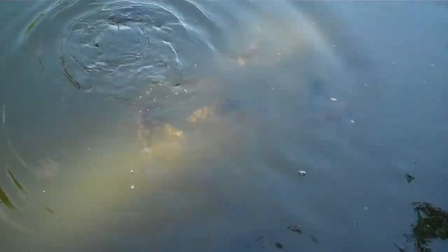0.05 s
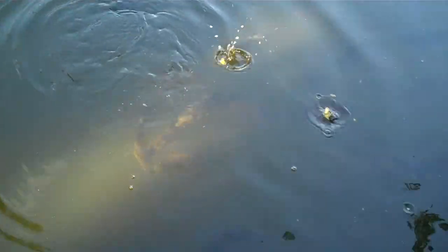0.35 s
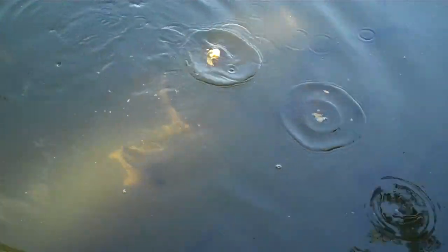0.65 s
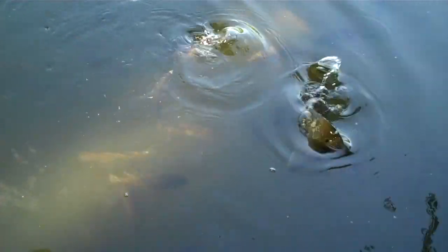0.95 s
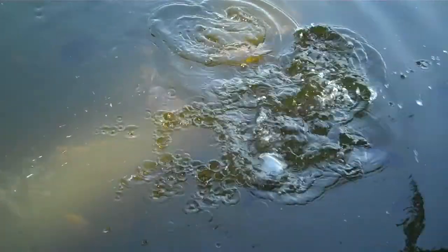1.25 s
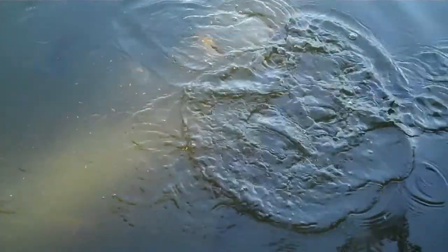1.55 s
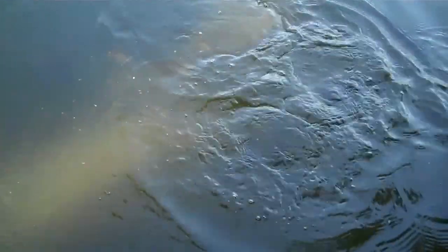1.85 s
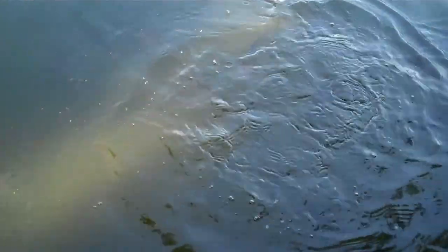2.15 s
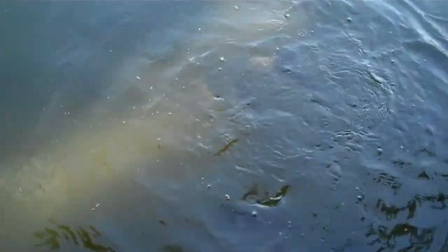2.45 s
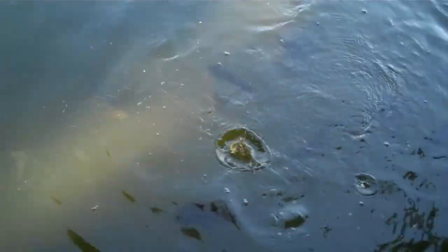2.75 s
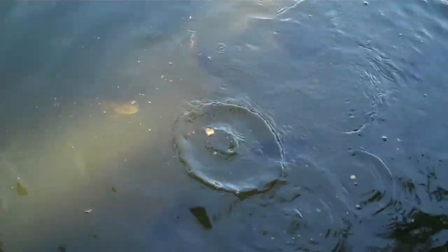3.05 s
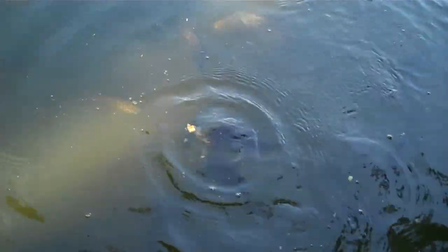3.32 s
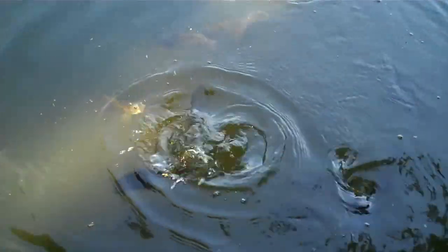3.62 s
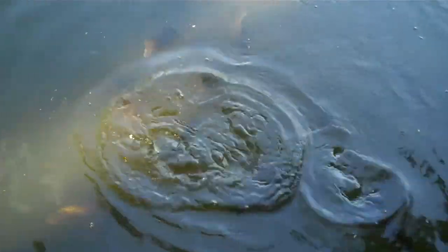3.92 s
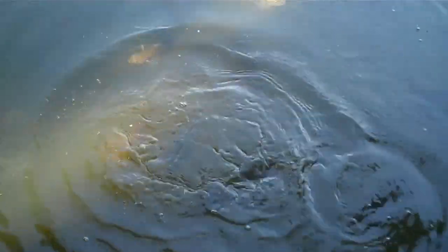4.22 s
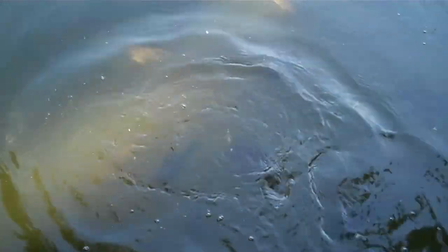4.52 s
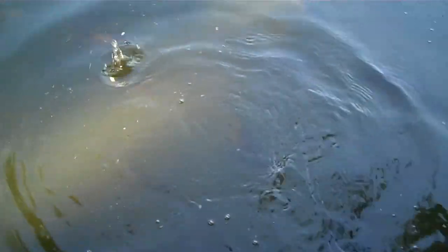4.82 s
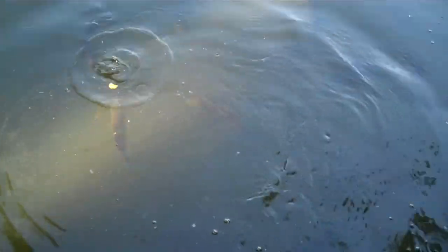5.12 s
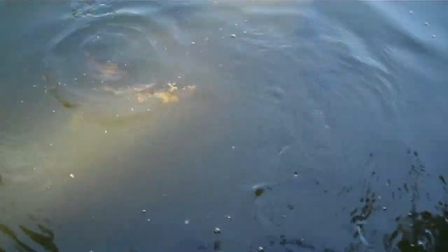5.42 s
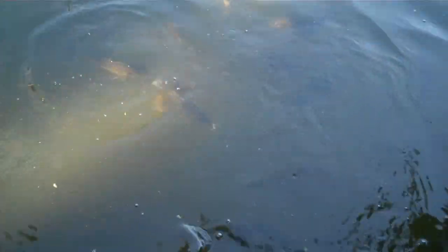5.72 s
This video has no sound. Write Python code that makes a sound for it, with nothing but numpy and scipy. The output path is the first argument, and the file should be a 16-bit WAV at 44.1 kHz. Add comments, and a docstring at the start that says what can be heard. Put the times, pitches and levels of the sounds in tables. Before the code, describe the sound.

On a quiet pond, fish mouths snap at the surface and one fish thrashes, throwing spray that patters back. The water settles, then a sharp snap and two bubbling gulps come with more droplets. Near the end there are small drips, a few bird whistles and a faint high rustle. The water sounds close and bright through a small microphone, with thin bird calls and an engine idling far away throughout.

```python
"""Sharp snaps, splashes and plops on a pond, with small birds calling and an engine idling far away.
Fish are taking floating food: mouths snap at the surface, one fish thrashes, another rolls under with
two gulps. Air trapped in the water rings as bubbles, most of them rising in pitch, and spray patters
back. A small camera hears it all through two microphone ports (little openings) that ring in the treble."""
import sys
import numpy as np
from scipy import signal
from scipy.fft import rfft, irfft
from scipy.io import wavfile

SR = 44100
rng = np.random.default_rng(int(sys.argv[2]) if len(sys.argv) > 2 else 0)


def inscribe(sig):
    """Save sig as 16-bit PCM at rate SR to the path in sys.argv[1].

    A 1-D sig is mono; a 2-D sig holds one channel per row.
    Samples are clipped to [-1, 1] before scaling.
    """
    pcm = np.round(np.clip(np.atleast_2d(sig).T, -1, 1) * 32767)
    wavfile.write(sys.argv[1], SR, pcm.astype(np.int16))


N = 258867
TIME = np.arange(N) / SR

# tone colour of tearing water, for snaps and foam: (frequency [Hz], level [dB])
TEAR_COLOUR = [(200, -36), (700, 11), (1500, 16), (3500, 12), (5000, -4.5), (8000, -6), (14000, -2)]


def amp(db):
    """Turns decibels into a number to multiply by."""
    return 10 ** (np.asarray(db) / 20)


def unit(x):
    """Scales a signal to an average (rms) size of 1."""
    return x / np.sqrt(np.mean(x ** 2) + 1e-20)


def spectrum(points, hz):
    """Reads the gain at each frequency from a curve through (Hz, dB) points."""
    f, db = np.transpose(points)
    return amp(np.interp(np.log(hz + 1), np.log(f + 1), db))


def colour(x, points):
    """Makes some frequencies louder and others softer, following (Hz, dB) points."""
    return irfft(rfft(x) * spectrum(points, np.fft.rfftfreq(x.shape[-1], 1 / SR)), x.shape[-1])


def noise(points):
    """Steady noise shaped by (Hz, dB per Hz) points."""
    return colour(rng.standard_normal(N), points) * np.sqrt(SR / 2)


def drift(hz):
    """A smooth random wander of size 1; a higher hz makes it quicker."""
    smoothing = np.exp(-(np.fft.rfftfreq(N, 1 / SR) / hz) ** 2)
    return unit(irfft(rfft(rng.standard_normal(N)) * smoothing, N))


def add(mix, s, sound):
    """Mixes a sound in at s seconds."""
    part = mix[max(round(s * SR), 0):][:len(sound)]
    part += sound[:len(part)]


def surges(rows, attack_s, fall_db_per_s):
    """The joint loudness of (time, length, dB) surges that each rise, hold and die away."""
    power = np.zeros(N)
    for s, length, db in rows:
        rise = np.clip((TIME - s) / attack_s, 0, 1)
        power += (rise * amp(db - fall_db_per_s * np.maximum(TIME - s - length, 0))) ** 2
    return np.sqrt(power)


def echoes(x, fade_s, delay_s):
    """A cloud of reflections, different for each ear, that falls 60 dB in fade_s."""
    t = np.arange(SR // 2) / SR
    tail = rng.standard_normal((2, len(t))) * amp(-60 * t / fade_s) * (t > delay_s)
    return signal.fftconvolve(x[None], tail / np.linalg.norm(tail[0]), axes=1)[:, :N]


def ping(hz, cycles, swell):
    """A small bubble: a tone that swells as the bubble pinches off, then dies while its pitch creeps up."""
    age = np.arange(int(6 * cycles * SR / hz) + 2) * hz / SR / cycles
    tone = np.sin(2 * np.pi * cycles * age * (1 + 0.0047 * age))
    return tone * np.exp(-age) * (1 - np.exp(-(age / swell) ** 2))


def swarm(per_s, low_hz, high_hz, cycles, spread_db):
    """Countless small pings of many pitches and sizes, born at random moments."""
    out, pitches = np.zeros(N), 32
    for hz in np.geomspace(low_hz, min(high_hz, SR / 2), pitches):
        when, chance = rng.random((2, 1500))
        used = np.arange(len(when)) < per_s * N / SR / pitches
        births = np.zeros(N)
        births[(when * N).astype(int)[used]] = amp(-spread_db * np.log(chance[used] + 0.016))
        out += signal.oaconvolve(births, ping(hz, cycles, swell=0.084))[:N] * np.sqrt(hz)
    return unit(out)


def air(apart_hz=5500):
    """A soft outdoor wash: much alike in both ears in the bass, unrelated in the treble."""
    # the wash: (frequency [Hz], level [dB per Hz])
    wash = [(30, -103), (100, -79), (600, -91.5), (1100, -93), (2000, -100), (3500, -102.5), (5500, -101.5),
            (7500, -107), (10000, -115), (15000, -146)]
    angle = np.pi / 4 * np.minimum(np.fft.rfftfreq(N, 1 / SR) / apart_hz + 0.47, 1)
    mid = rfft(noise(wash)) * np.cos(angle)
    side = rfft(noise(wash)) * np.sin(angle)
    return irfft([mid + side, mid - side], N)


def engine(cycle_hz=15.4, waver_db=0.255, hum_db=-1, rumble_db=2, fade_db_per_s=0.91):
    """A distant engine hums and rumbles; its higher tones waver more and slowly fade with the rumble."""
    # tones of the hum: (multiple of the cycle rate, level [dB])
    tones = [(4, -54), (5, -48), (6, -70), (9, -54), (12, -55), (14, -52.5), (19, -54.5)]
    # the rumble: (frequency [Hz], level [dB per Hz])
    rumble = [(40, -102), (80, -75), (130, -79), (200, -71), (310, -66), (390, -86), (560, -78),
              (1000, -110)]
    # the whole engine gets quieter near the end: (time [s], level [dB])
    loudness = [(4.2, -8.5), (5.87, -13.5)]
    turns = cycle_hz * TIME + 0.012 * drift(2.5)  # slightly uneven speed
    fade_db = -fade_db_per_s * TIME
    hum = np.zeros(N)
    for multiple, db in tones:
        level = amp(db + hum_db + multiple * waver_db * drift(1.6) + fade_db * (multiple > 6))
        hum += np.sqrt(2) * level * np.sin(2 * np.pi * (multiple * turns + rng.random()))
    overall = amp(np.interp(TIME, *np.transpose(loudness)))
    return overall * (hum + amp(rumble_db + fade_db) * noise(rumble))


def birds(direct_db=-8.5, trees_db=-9.0, arch=0.0257, chirp_every_s=0.13):
    """Thin gliding notes that arch, quaver and flutter a little, blurred by the trees."""
    # one bird repeats a falling chirp in bouts: (time [s], length of the bout [s])
    bouts = [(0.406, .25), (1.691, .45), (3.136, .25), (5.344, .1), (5.793, .1)]
    # its chirp: (length [s], first pitch [Hz], last pitch [Hz], level [dB])
    chirp = (.05, 4900, 3100, -58.5)
    # a second bird gives high upward flicks: (time [s], level [dB])
    flick_calls = [(0.133, -40.5), (2.527, -42), (3.693, -37.5), (4.687, -41)]
    # its flick: (length [s], first pitch [Hz], last pitch [Hz])
    flick = (0.0104, 5730, 7950)
    # a farther bird answers with soft rising peeps: (time [s])
    peep_times = [2.414, 3.039, 3.28, 4.06]
    # its peep: (length [s], first pitch [Hz], last pitch [Hz], level [dB])
    peep = (0.1, 2197, 2596, -62)
    # other birds whistle: (time [s], length [s], first pitch [Hz], last pitch [Hz], level [dB])
    whistles = [(4.44, 0.033, 6880, 7270, -57), (5.122, 0.055, 2820, 3100, -51),
                (5.402, 0.029, 3950, 4470, -41.5), (5.478, 0.051, 2340, 2580, -45.5),
                (5.554, 0.048, 2700, 3045, -45.5), (5.618, 0.16, 2820, 2580, -57),
                (5.852, 0.029, 3770, 4220, -41)]
    chirps = [(s + after, *chirp) for s, length in bouts for after in np.arange(0, length, chirp_every_s)]
    flicks = [(s, *flick, db) for s, db in flick_calls]
    peeps = [(s, *peep) for s in peep_times]
    out, quaver = np.zeros(N), 1 + .02 * drift(200)
    for s, length, first, last, db in chirps + flicks + peeps + whistles:
        age = np.linspace(0, 1, int(length * SR))
        hz = (first + (last - first) * age) * (1 + arch * np.sin(np.pi * age))
        hz *= np.roll(quaver, -int(s * SR))[:len(hz)]
        tone = np.sin(2 * np.pi * np.cumsum(hz) / SR)
        add(out, s, amp(db) * signal.windows.tukey(len(hz), .6) * tone)
    out *= 1 + .45 * drift(120)  # flutter
    return amp(direct_db) * out + amp(trees_db) * echoes(out, fade_s=.6, delay_s=.012)


def rustle(start_s=4.95, rise_s=.12, db=-64, clump_db=3.0):
    """A soft, uneven, high rustle of tiny ticks comes in near the end."""
    ticks = swarm(800, 4200, 13000, cycles=2, spread_db=5.5) * amp(clump_db * drift(35))
    return amp(db) * np.clip((TIME - start_s) / rise_s, 0, 1) * ticks


def thrashing(spray_db=-4, bubbling_db=-4, foam_db=-11, patter_db=-3, slosh_db=-5, calm_db=-75):
    """Each tail stroke throws fine spray and folds in air; droplets patter on over a faint slosh."""
    # strokes of the tail: (time [s], length [s], spray level [dB], bubbling level [dB])
    strokes = [(1.025, 0.0061, -52, -36.5), (1.097, 0.03, -31.5, -50), (1.149, 0.014, -38, -39.5),
               (1.196, 0.022, -37, -38), (1.265, 0.018, -35, -43.5), (1.379, 0.004, -38.5, -51)]
    # a fish stirs the surface and droplets patter: (time [s], length [s], level [dB])
    stirs = [(.82, 0.6, -62.5), (3.638, 0.035, -52.5), (3.69, 0.11, -48), (3.88, 0.017, -44.5),
             (5.372, .01, -54.5), (5.785, 0.021, -50)]
    thrown = [(s, length, db) for s, length, db, _ in strokes]
    folded = [(s, length, db) for s, length, _, db in strokes]
    foam = amp(foam_db) * unit(noise(TEAR_COLOUR))
    gurgle = swarm(2000, 595, 3440, cycles=15, spread_db=5.6)
    clumps = amp(spray_db + 3 * drift(37))
    fizz = swarm(2400, 2570, 16900, cycles=4, spread_db=3.1)
    spray = surges(thrown, attack_s=0.0098, fall_db_per_s=144) * clumps * (fizz + foam)
    bubbling = surges(folded, attack_s=0.0098, fall_db_per_s=224) * amp(bubbling_db) * gurgle
    droplets = swarm(560, 4400, 11000, cycles=2.6, spread_db=5)
    stirred = surges(stirs, attack_s=0.0015, fall_db_per_s=208)
    dripping = amp(-17) * surges(thrown, attack_s=0.0015, fall_db_per_s=37)  # thrown water falls back
    patter = amp(patter_db) * (amp(calm_db) + stirred + dripping)
    return spray + bubbling + patter * (droplets + amp(slosh_db) * (gurgle + foam))


def big_bubbles(fade_db=5.0, bend=1.21, attack_s=0.002, cloud_db=-16):
    """A bubble's pitch bends faster near the surface; water shakes it and it drags smaller ones along."""
    # large bubbles glide, mostly upward, as they rise:
    # (time [s], first pitch [Hz], last pitch [Hz], level [dB], length [s])
    glides = [(0.846, 1160, 2150, -37.5, 0.027), (.974, 1670, 1390, -38, 0.013),
              (1.052, 900, 1550, -34.5, 0.013), (1.08, 880, 1200, -39.5, 0.015),
              (1.184, 370, 570, -38.5, 0.0294), (1.208, 680, 797, -37, 0.051),
              (1.231, 3630, 3700, -34, .013), (1.46, 1250, 1690, -38, 0.022),
              (3.684, 501, 905, -32.5, 0.062), (3.698, 1017, 1400, -45, 0.03),
              (3.72, 1550, 2400, -51.5, 0.025), (3.743, 1180, 970, -44, 0.021),
              (3.791, 351, 592, -38, 0.069), (3.85, 547, 900, -38.5, 0.027),
              (3.901, 850, 1610, -40.5, 0.02)]
    out, shake, wobble = np.zeros(N), drift(160), drift(110)
    cloud = amp(cloud_db) * swarm(900, 800, 3200, cycles=6, spread_db=3)
    for s, first, last, db, length in glides:
        t = np.arange(0, length, 1 / SR)
        age, now = t / length, int(s * SR) + np.arange(len(t))
        hz = first * (last / first) ** (age ** bend) * (1 + .03 * wobble[now])
        tone = np.sin(2 * np.pi * np.cumsum(hz) / SR)
        shape = (1 - np.exp(-t / attack_s)) * amp(-fade_db * age) * (1 - age ** 8)
        add(out, s, amp(db) * shape * (1 + .3 * shake[now]) * (tone + cloud[now]))
    return out


def drops(splat_db=-23, splat_s=0.0023, pinch_s=.0007):
    """Each drop makes a brief splat, then pinches off a bubble: big ones plop, tiny ones only tick."""
    # a large drop or a slop of water falls in: (time [s], level [dB], bubble pitch [Hz])
    falls = [(0.3414, -30.5, 5940), (.671, -39, 713), (0.819, -28, 6840), (0.873, -35, 2740),
             (0.9256, -27.5, 5970), (1.038, -29, 2460), (1.043, -28.5, 800), (1.0956, -18.5, 5900),
             (1.109, -21, 2630), (1.111, -19, 3070), (1.1307, -17.5, 6400), (1.137, -21, 6940),
             (1.139, -28.5, 1387), (1.141, -26.5, 1700), (1.154, -31, 785), (1.170, -27.5, 766),
             (1.173, -28, 1060), (1.234, -14, 6760), (1.243, -31, 2220), (1.256, -26, 1980),
             (1.265, -33, 503), (1.2765, -22, 6040), (1.313, -20, 6300), (1.3189, -11.5, 6800),
             (1.322, -10.5, 6900), (1.376, -17, 6650), (1.395, -24, 4260), (1.4127, -19.5, 2550),
             (1.4409, -17, 6800), (1.461, -20.5, 6060), (1.5732, -30.5, 5900), (3.5578, -18.5, 7360),
             (3.559, -33.5, 5900), (3.653, -28, 5910), (3.679, -15, 7400), (3.682, -29, 3120),
             (3.685, -22, 7100), (3.743, -27, 6300), (3.746, -14.5, 6040), (3.7915, -12, 6000),
             (3.805, -19.5, 4520), (3.8083, -21.5, 2210), (3.9232, -28, 4330), (3.943, -19, 6000),
             (3.9728, -32, 3440), (3.976, -44, 1030), (4.122, -36, 5900), (5.012, -26, 6460),
             (5.0483, -23, 5750), (5.055, -23, 7000), (5.249, -28, 6030), (5.469, -32.5, 5400)]
    # tone colour of a splat: (frequency [Hz], level [dB])
    splat_colour = [(500, -37), (2500, 1.5), (6500, -14), (9000, -3.5), (14000, -8)]
    out, age = np.zeros(N), np.arange(1024) / SR / splat_s
    for s, db, hz in falls:
        splat = unit(colour(rng.standard_normal(len(age)), splat_colour)) * age * np.exp(1 - age)
        add(out, s, amp(db + splat_db) * splat)
        cycles = np.interp(hz, [3000, 6000], [6, 1.5])  # low bubbles ring longer
        add(out, s + pinch_s, amp(db) * ping(hz, cycles, swell=0.18))
    return out


def mouth_snaps(crack_db=-6, pocket_db=-8, attack_s=0.00026, bass_lift_db=5):
    """The water film tears with a crack and the pocket of air in the fish's mouth rings."""
    # a mouth snaps at the surface:
    # (time [s], level [dB], air pocket pitch [Hz], bass against treble [dB], decay time [s])
    bites = [(0.398, -29, 1860, -27.5, 0.0005), (0.671, -15.5, 1740, -28.5, 0.00041),
             (0.885, -12.5, 1680, -20, 0.0033), (1.038, -28.5, 2410, -6, 0.0053),
             (2.742, -30, 2130, -20.5, 0.0026), (3.435, -10, 1327, -23, 0.0028),
             (4.73, -25, 2830, -26.5, 0.0012), (5.049, -40.5, 3330, 6.5, 0.0015)]
    # tones of the air pocket: (multiple of its pitch, level [dB])
    pocket_tones = [(1.002, 8), (1.77, 4.5), (2.55, 1)]
    out, t = np.zeros(N), np.arange(2048) / SR
    for s, db, hz, bass_db, decay_s in bites:
        shape = (1 - np.exp(-t / attack_s)) * np.exp(-t / max(decay_s, attack_s))
        shape /= shape.max()
        bass_db += bass_lift_db
        tear = colour(rng.standard_normal(len(t)), TEAR_COLOUR)
        crack = colour(tear, [(3000, bass_db), (5500, 0)]) * shape
        add(out, s, amp(db + crack_db) * crack * np.linalg.norm(shape) / np.linalg.norm(crack))
        for multiple, tone_db in pocket_tones:
            ring = ping(hz * multiple, cycles=5.8, swell=0.69)
            add(out, s, amp(db + pocket_db + bass_db + tone_db) * ring)
    return out


def scene(bank_db=-18, surroundings_db=-31, left_lag_s=.00004, scatter_db=-1.4, right_db=6.0):
    """Close splashes scatter a little left and right and echo; the rustle is off to the right."""
    water = mouth_snaps() + drops() + big_bubbles() + thrashing()
    delay = np.exp(-2j * np.pi * np.fft.rfftfreq(N, 1 / SR) * left_lag_s)
    left = irfft(rfft(water) * delay, N)
    sides = np.array([[-1], [1]])  # left, right
    pond = np.array([left, water]) * amp(sides * scatter_db * drift(50))
    pond += amp(bank_db) * echoes(water, fade_s=0.094, delay_s=0.0016)
    pond += amp(surroundings_db) * echoes(water, fade_s=0.96, delay_s=0.024)
    return pond + amp(sides * right_db) * rustle() + birds() + engine() + air()


def record(dry, top_hz=16500):
    """Each port is a small hollow that rings; a faint hiss is added and the highest treble is cut."""
    # ringing of the left and right port: (frequency [Hz], width [Hz])
    ports = [(7330, 2280), (6250, 1520)]
    # the left port stays open to the top octave: (frequency [Hz], level [dB])
    left_lift = [(8500, 2), (11000, 1), (14000, 5.5), (16000, -19)]
    # the right port is shaded, so it sounds duller: (frequency [Hz], level [dB])
    right_shade = [(5000, 1.5), (9500, -3.5), (13000, -19)]
    # a faint, steady hiss that ends just above 14 kHz: (frequency [Hz], level [dB per Hz])
    hiss = [(20, -103), (200, -108), (14000, -107), (14600, -145)]
    hz = np.fft.rfftfreq(N, 1 / SR)
    left, right = (1 / (1 - (hz / f) ** 2 + 1j * hz * width / f ** 2) for f, width in ports)
    response = np.array([left * spectrum(left_lift, hz), right * spectrum(right_shade, hz)])
    heard = irfft(rfft(dry) * response, N) + np.array([noise(hiss), noise(hiss)])
    treble_cut = signal.firwin(511, top_hz, window=("kaiser", 9), fs=SR)
    return signal.oaconvolve(heard, treble_cut[None], "same")


dry = scene()
out = record(dry)
inscribe(out)
```